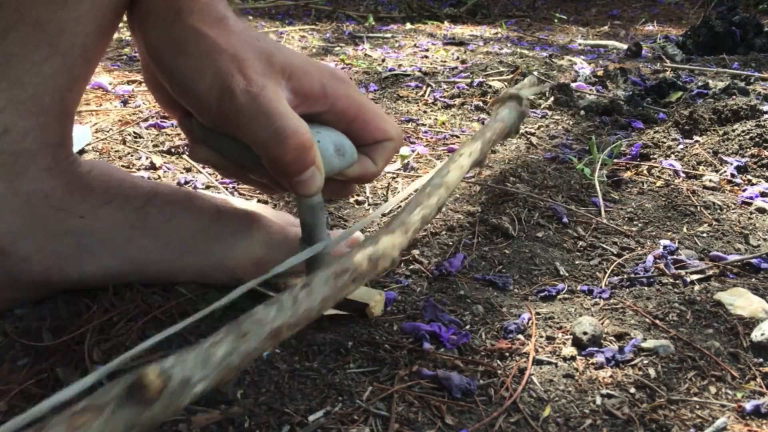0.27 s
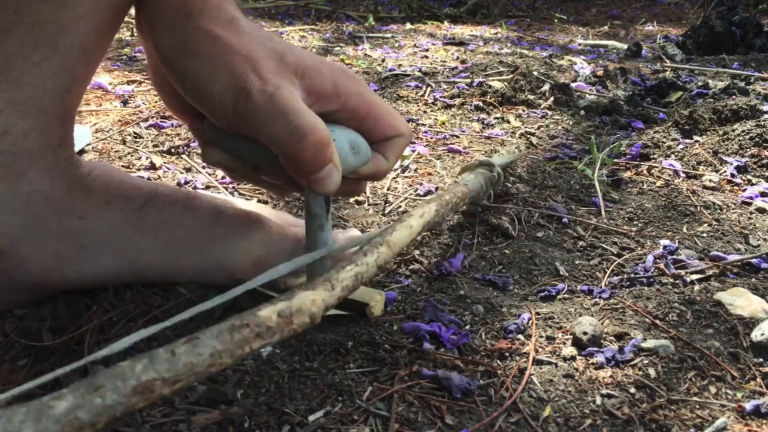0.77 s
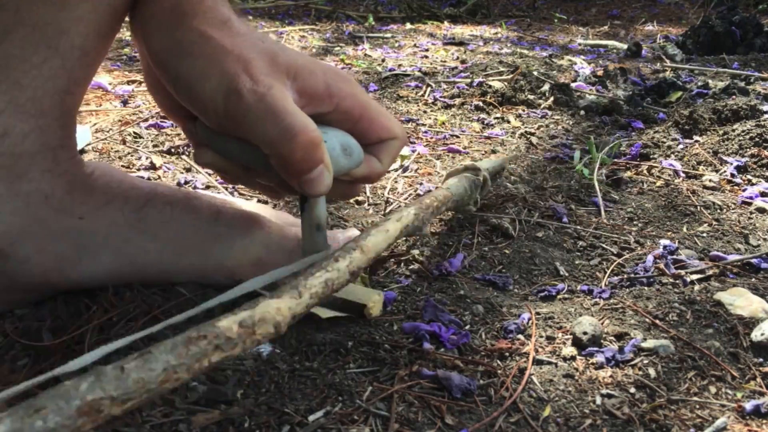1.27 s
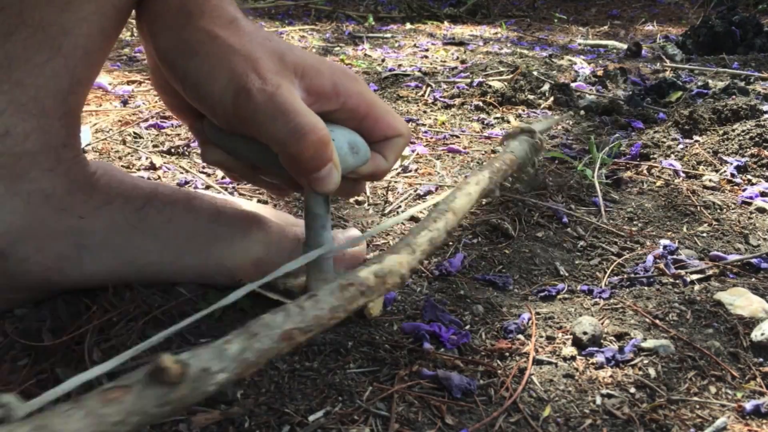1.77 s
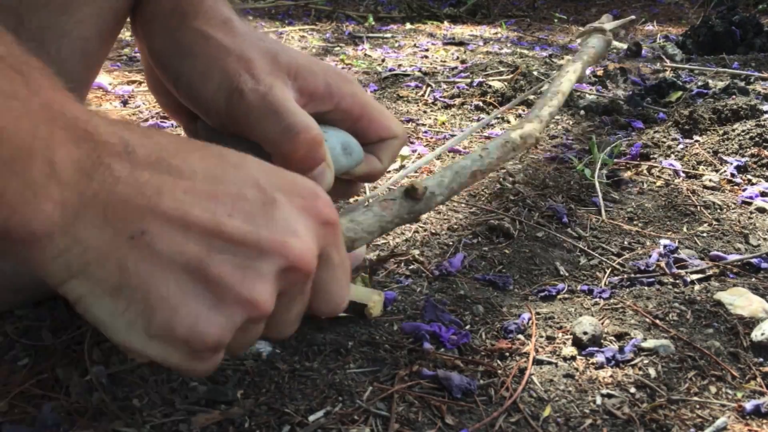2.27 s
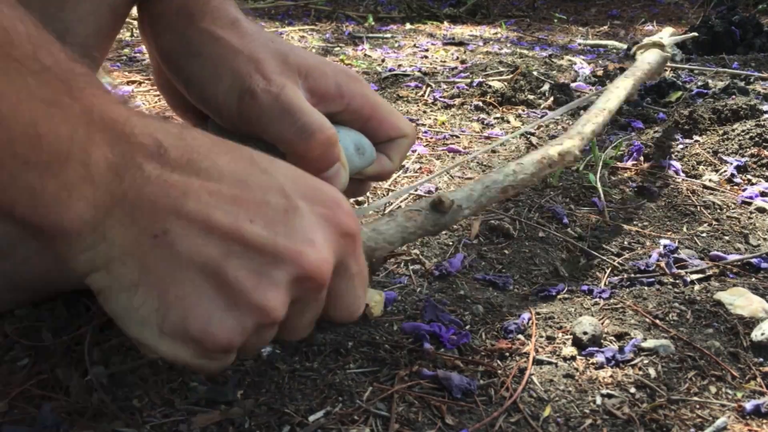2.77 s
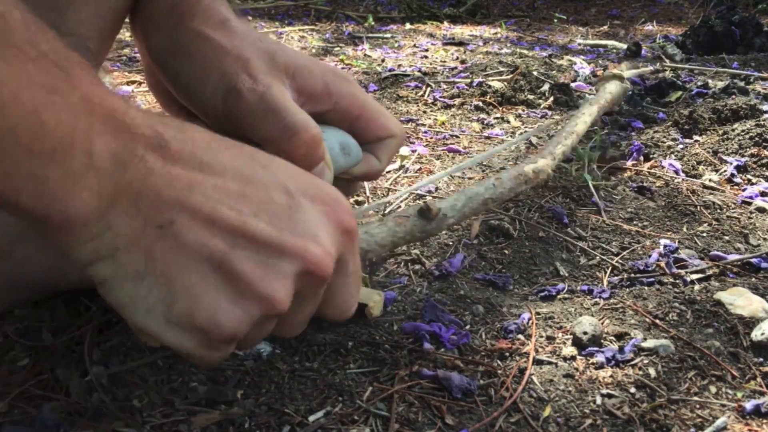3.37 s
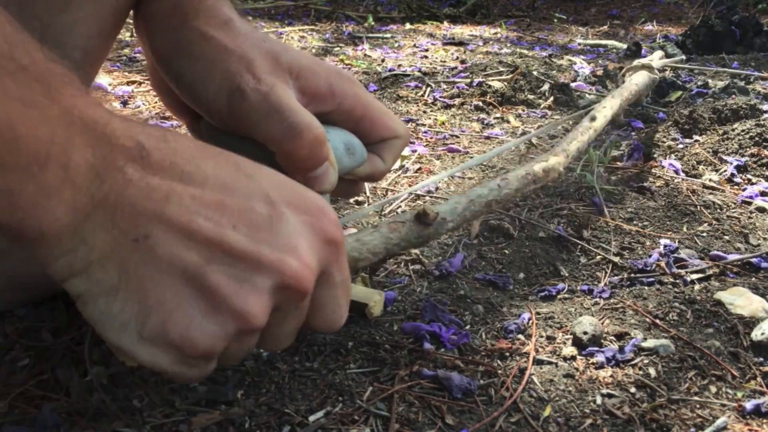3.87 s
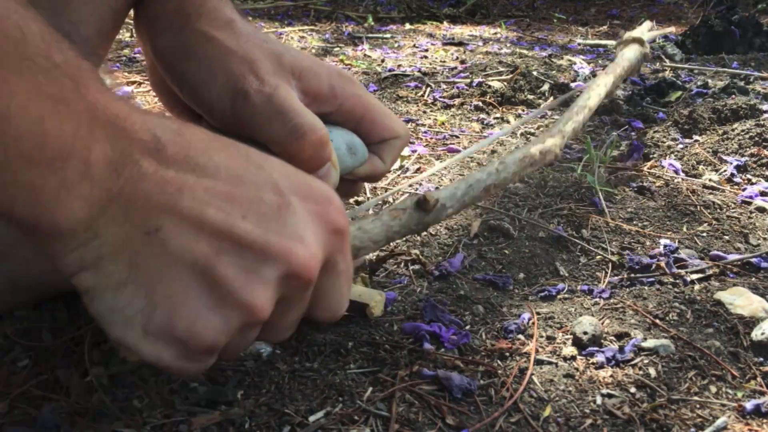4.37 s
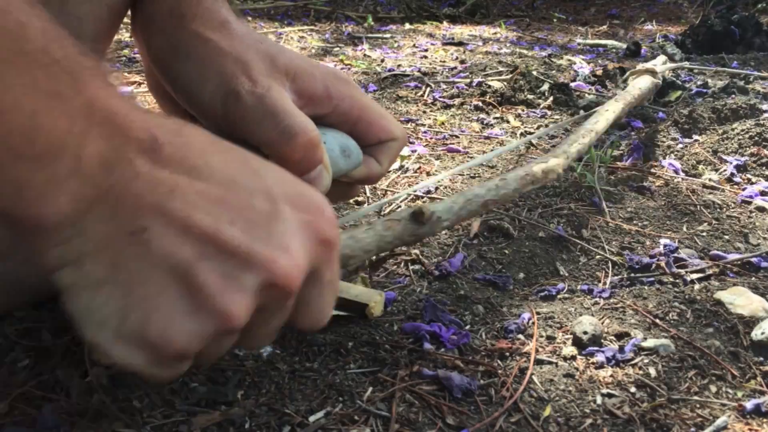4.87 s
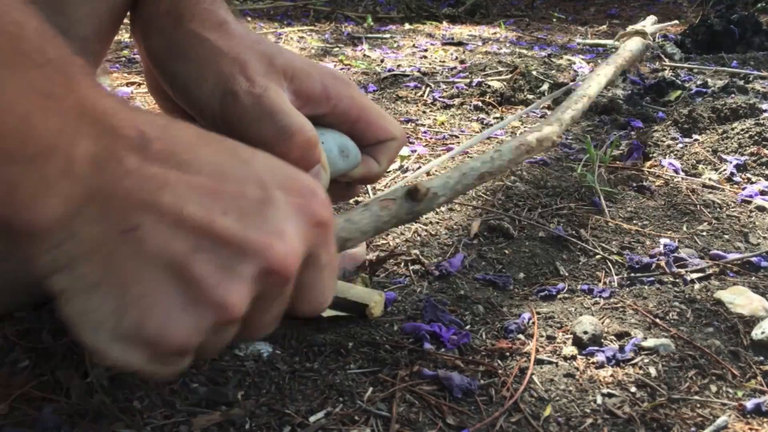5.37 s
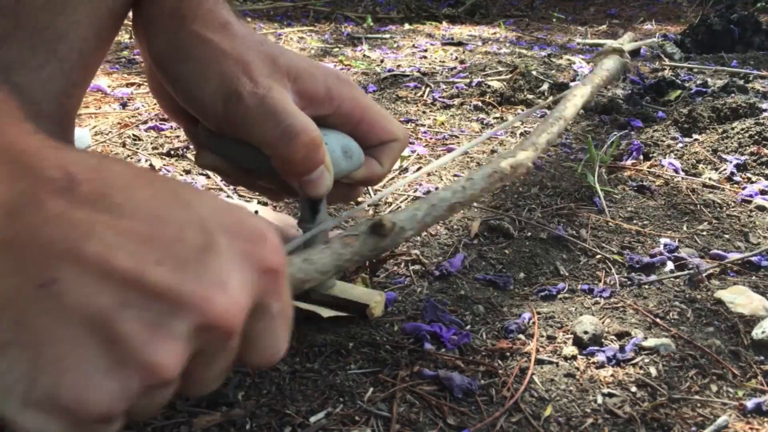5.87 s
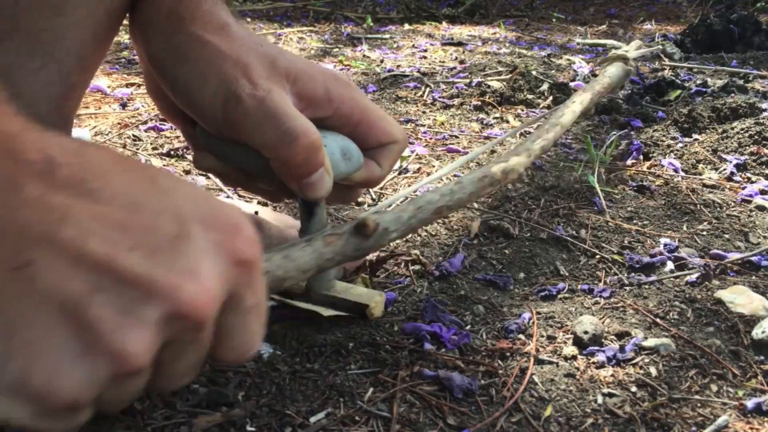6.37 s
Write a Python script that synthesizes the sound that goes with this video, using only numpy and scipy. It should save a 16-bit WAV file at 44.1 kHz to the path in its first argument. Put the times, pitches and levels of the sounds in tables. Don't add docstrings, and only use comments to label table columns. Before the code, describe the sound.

Close, dry, mono: a bow drill works on bare ground, about four short rasping strokes a second with tiny gaps at each turn. Pushes hum low through board and cord, pulls hiss and rattle more. Woody knocks and gritty catches come first; later the spindle squeaks sharply, loudest and densest towards the end. Faint rumble and air lie underneath.

```python
import sys
import numpy as np
from scipy import signal
from scipy.fft import rfft, irfft
from scipy.io import wavfile
from scipy.ndimage import uniform_filter1d

SR = 44100
rng = np.random.default_rng(int(sys.argv[2]) if len(sys.argv) > 2 else 0)


def voltage_ratio(level):
    return 10 ** (np.asarray(level, float) / 20)


def to_wav(s):
    ch = np.atleast_2d(s).T
    pcm = np.round(np.clip(ch, -1, 1) * 32767)
    wavfile.write(sys.argv[1], SR, pcm.astype(np.int16))


N = 292824


def rms_one(x):
    return x / np.sqrt(np.mean(x ** 2) + 1e-20)


def in_time(rows):
    s, *columns = np.transpose(rows)
    return [np.interp(np.arange(N) / SR, s, c) for c in columns]


def colour(x, spectrum, low, high):
    hz, points = np.arange(N // 2 + 1) * SR / N + 1, np.array(spectrum)
    shaped = rfft(x) * voltage_ratio(np.interp(np.log(hz), np.log(points[:, 0]), points[:, 1]))
    inside = (hz > low) & (hz < high)
    return irfft(shaped, N) * N / np.sqrt(2 * np.sum(np.abs(shaped[inside]) ** 2))


def drift(rate_hz):
    r = np.exp(-2 * np.pi * rate_hz / SR)
    noise = rng.standard_normal(N + SR)
    return rms_one(signal.lfilter([1], [1, -2 * r, r * r], noise)[SR:])


def body(x, modes, shift_db=0.):
    out = 0
    for k, (hz, width_hz, db) in enumerate(modes):
        r = np.exp(-np.pi * width_hz / SR)
        ringing = signal.lfilter([1, 0, -1], [1, -2 * r * np.cos(2 * np.pi * hz / SR), r * r], x)
        out = out + (-1) ** k * voltage_ratio(db + shift_db * drift(7.1)) * rms_one(ringing)
    return rms_one(out)


def grains(per_s, spread_db):
    sizes = voltage_ratio(spread_db * np.minimum(rng.exponential(1, N), 3)) * rng.choice([-1, 1], N)
    return sizes * (rng.random(N) < per_s / SR) + 1e-18


def patchy(x, patch_db):
    edges_hz = np.geomspace(300, 17000, 9)
    out = 0
    for k, pair in enumerate(zip(edges_hz, edges_hz[1:])):
        band = signal.sosfilt(signal.butter(2, pair, "band", fs=SR, output="sos"), x)
        out = out + (-1) ** k * band * voltage_ratio(patch_db * (drift(7.8) + drift(27)))
    return out


# pitch_hz, density_db
AIR = [(15, -29), (25, 13), (107, 17), (198, 14), (666, -6), (1020, -1.5), (2490, -14), (4260, -52),
       (11500, -48), (14300, -83), (15500, -31)]
# time_s, level_db
RUMBLE = [
    (0.0, -43),
    (0.6, -49.5),
    (2.2, -52.5),
    (5.0, -59),
    (6.0, -47.5),
    (6.64, -63.5),
]
# time_s, level_db
DRONE = [
    (4.6, -75),
    (4.9, -59),
    (6.0, -62.5),
    (6.2, -81.5),
]


def outdoors():
    air = voltage_ratio(-63.5 + 0.29 * drift(1)) * colour(rng.standard_normal(N), AIR, 320, 14000)
    far = body(rng.standard_normal(N), [(63.6, 21, -3.0), (105, 33.5, -3)])
    drone = voltage_ratio(in_time(DRONE)[0]) * body(rng.standard_normal(N), [(330, 15, 0.033)])
    return air + voltage_ratio(in_time(RUMBLE)[0] + 0.5) * far + drone


def scatter(x):
    t60_s, level_db = .67, -73
    t = np.arange(SR // 5) / SR
    tail = rms_one(rng.standard_normal(len(t))) * voltage_ratio(-60 * t / t60_s) * (t > .004)
    return voltage_ratio(level_db) * signal.fftconvolve(x, tail)[:N]


# time_s, peak_db,
# ring_hz
KNOCKS = [(0.38, -19.5, 1300), (0.944, -28, 306), (1.525, -32, 324), (1.557, -27, 327), (1.625, -34, 353),
          (2.116, -12, 1450), (2.217, -31.5, 1150), (2.451, -11.5, 1460), (2.484, -26, 1264),
          (2.518, -32, 705), (3.074, -25, 1294), (3.31, -20, 1430), (3.344, -13.5, 1360),
          (3.867, -25, 1374), (6.14, -31.5, 703), (6.165, -24.5, 1293),
          (0.07, -28, 1690), (1.492, -25, 1690), (1.517, -25, 2290), (1.627, -19.5, 2360),
         (1.633, -20.5, 2040),
          (1.854, -27.5, 1290),
    (1.87, -34, 705),
    (1.884, -25, 1390),
    (3.519, -37, 781),
    (4.69, -31.5, 704),
    (5.134, -37, 570),
    (5.16, -32, 673),
    (5.196, -33.5, 703),
    (5.444, -25, 980),
    (6.197, -23, 1380),
]


def catches():
    out, t = np.zeros(N + SR), np.arange(SR // 25) / SR
    for s, peak_db, hz in KNOCKS:
        fade = np.exp(-t * (hz / 1.6 + 150))
        ring = np.sin(2 * np.pi * hz * t) * fade * (1 - np.exp(-t * 3000))
        out[int(s * SR):int(s * SR) + len(t)] += voltage_ratio(peak_db + 4.5) * ring
    return out[:N]


# start_s, stop_s, full_speed_hiss_db, lean_to_end_db, board_thrum_db
PUSHES = [(0.03, 0.225, -45, 1, -35.5), (0.591, 0.784, -45, 8, -33.5), (1.155, 1.353, -44, 1.5, -38),
          (1.729, 1.95, -45.5, 0.3, -37.5), (2.389, 2.562, -45, 0.8, -39), (2.919, 3.118, -44.5, 0.6, -42),
          (3.497, 3.675, -47, 0, -40), (4.007, 4.204, -47, 0.1, -39.5), (4.55, 4.753, -47.5, 6, -35.5),
          (5.059, 5.264, -44.5, -0.5, -38), (5.572, 5.776, -46, -0.5, -40.5),
          (6.082, 6.261, -46.5, 0.6, -40.5), (6.604, 6.795, -48.5, -8.5, -38)]
# start_s, stop_s, full_speed_hiss_db, lean_to_end_db, board_thrum_db
PULLS = [(0.327, 0.496, -44, 0.2, -41.5), (0.884, 1.062, -44, -4, -42.5), (1.449, 1.641, -44.5, 1.5, -44.5),
         (2.036, 2.244, -43, 1.3, -45.5), (2.646, 2.826, -45, 1.9, -46.5), (3.205, 3.4, -42.5, 5.5, -42),
         (3.75, 3.921, -45, 1, -45.5), (4.276, 4.453, -42, -0.5, -45), (4.806, 4.986, -44, 0.7, -42),
         (5.327, 5.488, -42.5, 0.5, -39), (5.837, 6, -40.5, -1, -42.5), (6.326, 6.502, -49, 3, -56)]


def pushing():
    ends_s = [stop + .04 for start, stop, *levels in sorted([*PUSHES, *PULLS])]
    turns = np.searchsorted(ends_s, np.arange(N) / SR)
    return uniform_filter1d(1. - turns % 2, size=600)


def stroke_db():
    pause_db = -72
    rows = [(0, pause_db)]
    for strokes, stop_db, stall_s in (PUSHES, -56, 0.0097), (PULLS, -58, 0.015):
        for start, stop, full_db, lean_db, thrum_db in strokes:
            place = np.clip(0.46 + 0.11 * lean_db, .3, .7)
            times = start + np.array([0, .16, place, .84, 1]) * (stop - start)
            shoulder_db = full_db - 6
            levels = [-59, shoulder_db - lean_db / 2, full_db, shoulder_db + lean_db / 2, stop_db]
            rows += [(start - .028, pause_db), (stop + stall_s, pause_db)]
            rows += zip(times, levels)
    return in_time(sorted(rows))[0]


def shaking_db():
    rest_db = (-60, -60)
    rows = [(-0.11, *rest_db)]
    for strokes, place in (PUSHES, 0.66), (PULLS, 0.63):
        for start, stop, full_db, lean_db, thrum_db in strokes:
            knock_db = -43.5 + .6 * min(thrum_db + 41, 0)
            for side in (-0.16, 0.16):
                rows.append((start + (place + side) * (stop - start), thrum_db - 0.5, knock_db))
            rows.append((stop + 0.026, *rest_db))
    return in_time(sorted(rows))


# pitch_hz, width_hz, level_db
BOARD = [(191.5, 41, 10.5), (225, 110, -10), (243, 17, -11.5)]
# pitch_hz, width_hz, level_db
SOCKET = [(546, 81, -4), (775, 100, -4.5), (1150, 840, 0.5)]


def thrum(hiss_db, thrum_db, knock_db):
    shake, push = grains(2500, 2.2), pushing()
    board = 0.5 * body(shake, BOARD, shift_db=.5)
    bow_db = -7.5 + (-14 + 7.5) * push
    bow = voltage_ratio(bow_db) * body(shake, [(264, 92, 0.1)])
    cord_hz = 190 * (1 + .13 * drift(37.9))
    cord = np.sqrt(2) * np.sin(2 * np.pi * np.cumsum(cord_hz) / SR) * voltage_ratio(1.9 * drift(31))
    level = voltage_ratio(thrum_db - 0.5 + .35 * (hiss_db + 48.5) + 1.5 * drift(29))
    socket = body(grains(500, 4.5), SOCKET, shift_db=2.5)
    knocks = voltage_ratio(knock_db - 10 + 5.8 * np.tanh(drift(20))) * socket
    return level * (board + bow + .55 * push * cord) + knocks


# pitch_hz, density_db
RASP = [(260, -10), (450, -19.5), (538, -7.5), (1020, -9.5), (2070, -4), (2780, -1.5), (4670, -8.5),
        (6190, -7), (12100, -8.5), (15500, -11.5)]
# pitch_hz, width_hz, level_db
SPINDLE = [(2503, 260, 7), (1360, 205, -5.5), (6080, 190, -3)]
# time_s, length_ms, level_db
SLIPS = [
    (1.997, 8.7, -52.5),
    (2.625, 2.7, -63),
    (4.776, 3, -44.5),
    (5.768, 4.8, -43.5),
]


def rasp(hiss_db, bite_db):
    t = np.arange(N) / SR
    dust = patchy(colour(grains(12000, 3.3), RASP, 6250, 19200), patch_db=1.32)
    wobble = 1.67 * np.tanh(drift(34) / 1.8)
    hiss = dust * voltage_ratio(1.6 * wobble + 1.1 * drift(140))
    fibres = body(grains(1100, 5.0), SPINDLE, shift_db=5.0)
    bite = fibres * voltage_ratio(bite_db - 0.5 + 6.7 * wobble)
    scrape_db = -0.15 * t + 2.8 * wobble
    scrape = pushing() * voltage_ratio(scrape_db) * body(grains(4000, 2.4), [(3640, 760, 0.1)])
    slips = 0
    for s, ms, db in SLIPS:
        slips = slips + voltage_ratio(db) * (t > s) * np.exp(-((t - s) * 1000 / ms) ** 2)
    return voltage_ratio(hiss_db) * (hiss + bite + scrape) + slips * dust


# middle_s, length_ms, peak_db, pitch_hz
SQUEALS = [(2.6903, 5.5, -21.5, 2408), (2.9348, 6.5, -12, 2473), (3.4136, 4.2, -30, 2164),
           (3.7835, 3.6, -20, 2427), (4.4021, 3.1, -22, 2475), (4.4377, 5.2, -5.5, 2415),
           (4.4466, 5.2, -6.5, 2398), (4.8292, 7.6, -27.5, 2450), (4.8558, 2.75, -11.5, 2455),
           (4.8664, 3.7, -12, 2358), (5.0014, 5.7, -28, 2025), (5.338, 8, -16, 2515),
           (5.378, 1.7, -6.5, 2307), (5.4615, 2.68, -10, 2314), (5.4907, 8.5, -13.5, 2494),
           (5.5022, 8.8, -23.5, 2395), (5.8545, 3.3, -7, 2352), (5.9654, 5.2, -13, 2229),
           (5.9919, 5.65, -8, 2457), (6.3746, 35, -8.5, 2345), (6.4052, 1.82, -7, 2144),
           (6.4219, 2.85, -6, 2283), (6.4369, 2.26, -8.5, 2114), (6.4537, 1.43, -10, 2147),
           (6.5311, 3.4, -32.5, 1950)]
# middle_s, length_ms, peak_db, pitch_hz
CHIRPS = [(1.4762, 3.8, -13.5, 2660), (2.076, 1.52, -18, 2285), (2.1808, 1.26, -21.5, 1974),
          (2.3307, 2.1, -36, 2328), (2.7686, 0.78, -18.5, 2020), (3.2091, 3.2, -29, 2422),
          (3.3414, 1.9, -20, 2570), (3.7959, 3.6, -29, 2225), (4.3008, 6.5, -32.5, 2430),
          (4.3161, 1.4, -26.5, 2493), (4.3435, 1.9, -35, 2262), (4.3745, 2.16, -24, 2400),
          (4.4269, 4.3, -14.5, 2510), (4.533, 2.6, -44, 2154), (4.894, 1.6, -22, 2143),
          (4.9084, 1.9, -24, 2214), (4.9582, 1.9, -24, 2285), (5.0697, 3.4, -30.5, 2320),
          (5.4108, 0.6, -8, 2505), (5.4323, 1.9, -21.5, 2186), (5.581, 6.3, -30, 2560),
          (5.8925, 7.5, -26.5, 2436), (5.929, 2.4, -16, 2402), (5.998, 1.27, -15.5, 2775),
          (6.167, 3.9, -26, 2323), (6.4898, 1.73, -37, 2292)]
# middle_s, length_ms, peak_db
GRINDS = [(0.38, 2, -26.5), (0.4132, 2.5, -29), (0.9463, 4.5, -31), (0.9773, 1.1, -25.5),
          (1.5247, 5.5, -29), (2.084, 6.9, -28), (2.109, 5.2, -21), (2.119, 8, -24.5), (2.1468, 1.1, -19.5),
          (2.2138, 1.5, -36.5), (2.2187, 3.8, -27), (2.4539, 4.4, -21), (3.311, 6, -29),
          (3.3458, 1.94, -23), (3.869, 2.6, -32), (4.927, 1.58, -29.5), (5.133, 4.7, -31.5),
          (5.2544, 5.2, -41.5), (5.415, 0.8, -16), (5.4201, 3.85, -23.5), (5.4371, 0.29, -22),
          (5.9002, 1.54, -31), (5.9207, 3.7, -25), (6.471, 1.1, -26.5), (6.614, 4.3, -42)]


def grips():
    rows = []
    for s, ms, db, hz in SQUEALS:
        over_db = max(-2 + 1.25 * db, -26) - 0.0194 * (hz - 2300)
        rows.append((s, ms, db, hz, over_db, -20.5 - 1.5 * min(ms, 8.5)))
    for s, ms, db, hz in CHIRPS:
        rows.append((s, ms, db, hz, max(-2 + 1.25 * db, -11.5), -16.5))
    for s, ms, db in GRINDS:
        rows.append((s, ms, db, 2180, -31, -4.5))
    return sorted(rows)


# pitch_hz, density_db
GRIT = [(300, -7), (750, -15.5), (1400, 0), (2500, 3.7), (4300, -5.5), (8000, -7.5), (15500, -17.5)]


def squeaks():
    t, table = np.arange(N) / SR, np.array(grips())
    tone, overtone, grit = np.zeros((3, N))
    for s, length_ms, peak_db, hz, over_db, grit_db in table:
        near = slice(int((s - .04) * SR), int((s + .04) * SR))
        after = t[near] - s
        away = np.abs(after) / (max(length_ms, .6) / 2000)
        away = away * np.where(after > 0, 1.12, .9)
        squareness = 1.25 + 0.085 * length_ms + (length_ms / 14) ** 2
        swell = voltage_ratio(peak_db - 6 * away ** squareness / (1 + 0.0662 * away))
        swell = swell * voltage_ratio(-150 * after)
        tone[near] += swell ** 2
        overtone[near] += (swell ** 2 / voltage_ratio(peak_db) * voltage_ratio(over_db)) ** 2
        grit[near] += (swell * voltage_ratio(grit_db + 0.5)) ** 2
    tone, overtone, grit = np.sqrt(tone), np.sqrt(overtone), np.sqrt(grit)

    swing = uniform_filter1d(tone, size=40)
    sag = 0.14 * np.gradient(swing) * SR / 1000 + 0.076 * (swing - .2)
    broken = np.clip((np.interp(t, table[:, 0], table[:, 5]) + 21) / 16, 0, 1)
    ends = [(s + side * ms / 2500, hz) for s, ms, db, hz, *mix in table for side in (-1, 1)]
    ends = np.array(sorted(ends))
    pitch = np.interp(t, ends[:, 0], ends[:, 1])
    pitch = pitch * (1 + (.024 + .12 * broken) * drift(300) - sag)
    phase = 2 * np.pi * np.cumsum(pitch) / SR

    third = voltage_ratio(-6 - 9 * ((3 * pitch - 6450) / 550) ** 2).clip(voltage_ratio(-17))
    third = third * voltage_ratio(3 * drift(150) + 1.0)
    fourth = voltage_ratio(-7 - 9 * ((4 * pitch - 8500) / 350) ** 2).clip(voltage_ratio(-30))
    upper = np.cos(2 * phase + 0.59) + third * np.cos(3 * phase) + fourth * np.cos(4 * phase)
    high_edge = voltage_ratio(-22.5) * np.clip((pitch - 2350) / 150, 0, 1) * np.sin(3 * phase)
    rough = colour(grains(11000, 0.49), GRIT, 800, 3100)
    flutter = voltage_ratio((.7 + 3.5 * broken) * np.tanh(drift(350)))
    return tone * (np.cos(phase) * flutter + high_edge) + overtone * upper + grit * rough


def scene():
    hiss_db, (thrum_db, knock_db) = stroke_db(), shaking_db()
    bite_db = -2 + 0.92 * np.arange(N) / SR + 4 * (1 - pushing())
    squeal = squeaks()
    drill = thrum(hiss_db, thrum_db, knock_db) + catches() + rasp(hiss_db, bite_db) + squeal
    return (outdoors() + scatter(squeal) + drill)[None]


def low_pass(x):
    return signal.sosfilt(signal.butter(12, 16480, fs=SR, output="sos"), x)


def record(dry):
    cut = signal.sosfilt(signal.butter(2, 42, "high", fs=SR, output="sos"), dry)
    cut = signal.sosfilt(signal.cheby2(16, 60, 15700, fs=SR, output="sos"), cut)
    return low_pass(cut)


dry = scene()
out = record(dry)
to_wav(out)
```